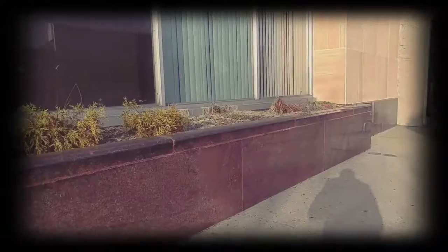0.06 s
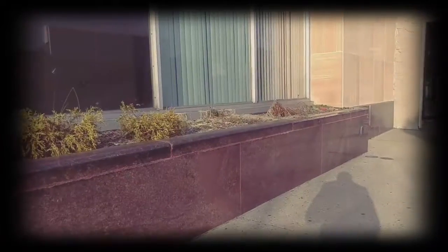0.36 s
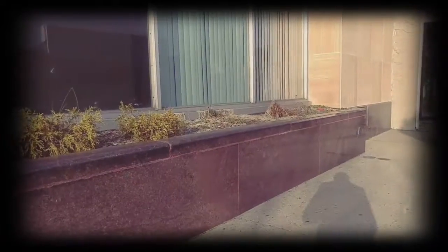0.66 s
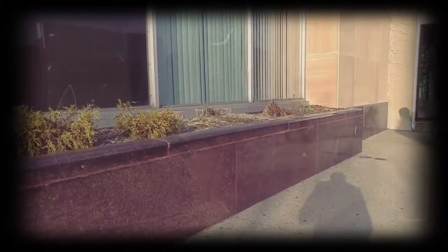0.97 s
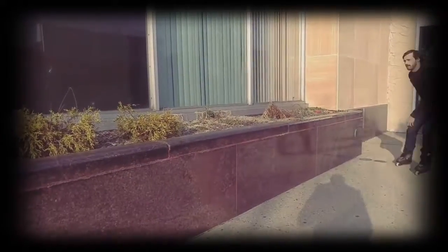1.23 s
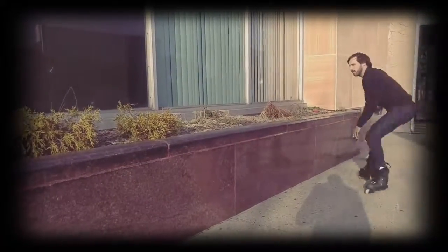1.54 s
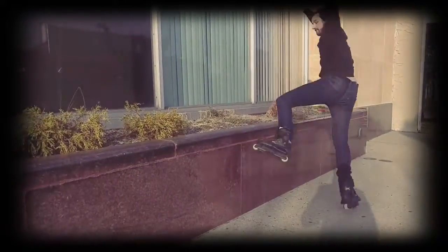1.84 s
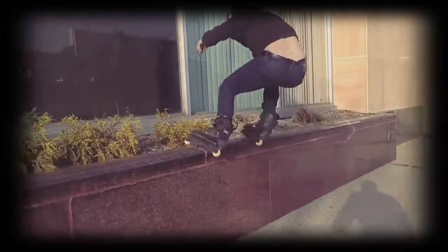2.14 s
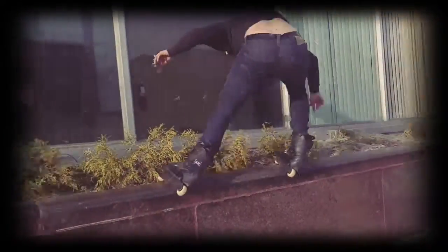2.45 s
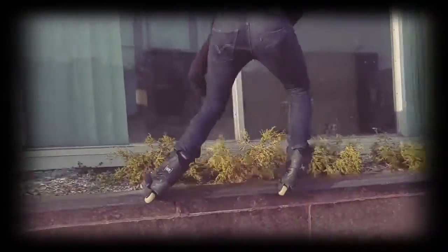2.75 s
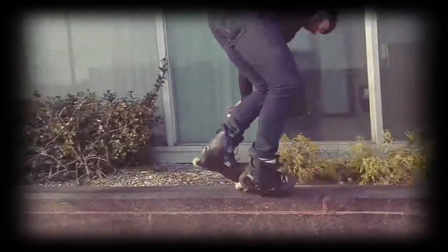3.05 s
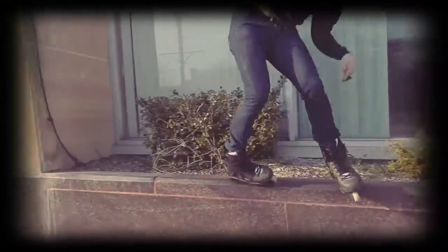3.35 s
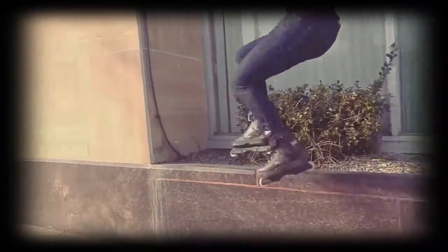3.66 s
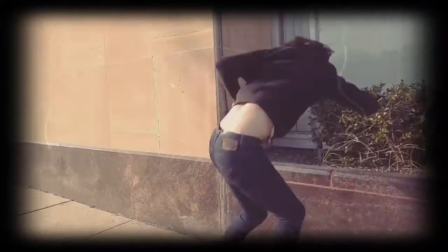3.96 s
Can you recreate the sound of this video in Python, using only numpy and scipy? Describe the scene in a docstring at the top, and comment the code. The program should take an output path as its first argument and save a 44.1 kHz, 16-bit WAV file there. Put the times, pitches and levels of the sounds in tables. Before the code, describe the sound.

Inline skates start rolling on gritty concrete close by at about 0.5 seconds, with a few clacks, whirring bearings and wind rumbling on the microphone until 1.3. After knocks around 1.7, the skates land hard on a stone ledge at 2.1 and grind along it in stuttering scrapes and clacks with a slight street echo. The grinding stops near 3.6, and wheels rumble on until 4 seconds.

```python
"""Inline skates grinding a ledge

Skates roll on a concrete sidewalk beside a building, one pair close to the microphone throughout.
A skater pushes off and jumps. Both skates clack onto a stone ledge and grind along it, their plastic
frames sticking and slipping on the edge, then slide off its end. The near wheels roll on, rumbling on
rough concrete and hissing on sand. Wind buffets the microphone early on, and the street echoes the blows."""
import sys
import numpy as np
from scipy import signal
from scipy.fft import rfft, irfft
from scipy.io import wavfile
from scipy.ndimage import uniform_filter1d, minimum_filter1d

SR = 44100
rng = np.random.default_rng(int(sys.argv[2]) if len(sys.argv) > 2 else 0)


def put_to_file(sound):
    """Save the sound as 16-bit audio at rate SR, in the file named by the first command-line argument."""
    columns = np.atleast_2d(sound).T  # one column per channel
    safe = np.clip(columns, -1, 1)
    whole_steps = np.round(safe * 32767)
    wavfile.write(sys.argv[1], SR, whole_steps.astype(np.int16))


N = 176400
T = np.arange(N) / SR

# Frames rubbing on the stone: t/s, length/s, ring level/dB, ring f/Hz, rasp level/dB, grit level/dB
SCRAPES = [(1.72, 0.089, -26, 738, -28.5, -33), (2.149, 0.042, -26, 830, -27, -27.5),
           (2.195, 0.034, -21, 773, -25, -23), (2.233, 0.13, -35, 690, -31.5, -29.5),
           (2.382, 0.023, -26, 710, -41, -26), (2.406, 0.28, -30, 895, -30, -31),
           (2.644, 0.024, -19, 954, -34, -29.5), (2.708, 0.039, -25.5, 900, -30, -31),
           (2.756, 0.075, -28.5, 900, -30.5, -33), (2.838, 0.12, -19.5, 881, -26, -24.5),
           (2.995, 0.038, -20.5, 864, -26, -24), (3.043, 0.26, -34.5, 854, -36, -39),
           (3.331, 0.151, -28, 905, -32.5, -35.5), (3.459, 0.16, -22.5, 957, -25.5, -26)]
# Bands in which boot and frame ring: multiple of the main pitch, level/dB, half width as a share of pitch
FRAME_BANDS = [(.38, -11, .2), (.77, -14, .09), (1, 0, .115)]
# Blows on concrete and stone:
# t/s, length/s, thud level/dB, ring level/dB, ring f/Hz, shell level/dB, crack level/dB
BLOWS = [(0.626, 0.0076, -20.5, -24.5, 730, -30.5, -35.5), (.661, 0.0087, -30, -26, 740, -27, -23.5),
         (0.674, 0.016, -22, -46, 734, -29.5, -31), (1.007, 0.0035, -23.5, -46, 725, -48, -28.5),
         (1.109, .004, -25, -48, 750, -34, -31), (1.626, 0.0037, -43, -37, 780, -41, -35),
         (1.708, 0.013, -21, -25, 695, -27.5, -27), (1.748, 0.0035, -36, -12, 810, -25, -33),
         (1.777, 0.0022, -27, -7, 734, -39, -26), (1.844, 0.0019, -42, -11, 745, -28, -38),
         (1.904, 0.011, -41, -39, 816, -36, -25), (2.1424, 0.0077, -17, -11, 844, -16, -15),
         (2.2681, 0.0074, -15.5, -7.5, 800, -17, -12), (2.275, 0.0082, -27, -12, 729, -10, -9),
         (2.297, 0.008, -13, -16.5, 740, -18, -17), (2.388, 0.0066, -25, -27, 690, -20.5, -27),
         (2.476, 0.011, -39, -27, 797, -24.5, -27), (2.491, 0.0068, -17.5, -13.5, 657, -16, -18),
         (2.64, 0.0029, -36, -11.5, 910, -26, -23), (2.659, 0.0036, -34, -10, 940, -42, -22.5),
         (2.683, 0.0048, -32, -15, 940, -27, -25.5), (2.713, 0.0042, -36, -16, 973, -32, -31),
         (2.836, 0.0077, -16, -10.5, 840, -17.5, -17.5), (2.854, 0.0043, -34, -9, 875, -17, -19.5),
         (2.876, 0.0027, -34, -7, 880, -35, -45), (2.887, 0.0038, -36, -12, 880, -34, -27),
         (2.9, 0.0049, -20, -9, 890, -22, -17.5), (2.916, 0.0084, -26, -15.5, 877, -23, -22),
         (2.995, 0.0092, -19, -18, 880, -30, -34), (3.099, 0.0037, -35, -11, 910, -18.5, -21),
         (3.126, 0.0054, -19, -11, 830, -21, -27.5), (3.172, 0.0014, -37, -29, 870, -31, -25),
         (3.2, 0.0044, -32, -41, 900, -22.5, -26), (3.215, 0.0029, -52, -34, 910, -23, -33),
         (3.248, 0.0034, -43, -41, 883, -20, -24), (3.282, 0.0036, -36, -19, 925, -22, -48),
         (3.305, 0.0083, -46, -19, 874, -24.5, -25), (3.314, 0.0068, -18.5, -9, 817, -17.5, -20),
         (3.377, 0.0075, -35, -16.5, 895, -42, -36), (3.476, 0.0049, -31, -17.5, 930, -26, -30),
         (3.501, 0.0027, -30, -6, 905, -36, -19.5), (3.519, 0.0057, -23, -12, 950, -21, -21),
         (3.551, 0.0099, -18, -16.5, 900, -22, -25.5), (3.601, 0.0047, -15, -12, 1000, -27, -31),
         (3.753, 0.013, -53, -26.5, 930, -25, -29), (3.81, 0.0034, -44, -48, 894, -32, -33.5)]
# Tones of the axle metal: f/Hz, level/dB, time to fade by 60 dB/s
PING_TONES = [(5300, -10, .012), (5580, -7, .012), (6000, -16, .008), (6750, -10, .013)]
# Free wheels shaking on their axles: t/s, length/s, level/dB
RATTLES = [(2.198, 0.025, -23.5), (2.301, 0.034, -26), (2.378, .026, -29.5), (3.193, 0.012, -33),
           (3.245, 0.0025, -21.5)]
# Pitch of the wheels' hum: t/s, f/Hz
HUM_PITCH = [(.6, 66), (1.1, 70.14), (1.5, 71.9), (1.8, 76), (2.4, 72), (4, 70.8)]
# Tones in that hum: multiple of the pitch, level/dB
HUM_TONES = [(1, 0), (2, -2)]
# Whirring bearings: f/Hz, width/Hz, level/dB, loudest at t/s, spread/s
BEARINGS = [(8500, 380, -40.5, 1.5, 0.36), (5170, 240, -48.5, 1.72, 0.18)]
# Echoes from pavement and wall: left delay/s, right delay/s, level/dB
ECHOES = [(.0052, 0.0067, -28), (0.0135, .0118, -16.5), (.024, .027, -37)]

# How the long sounds swell and fade: t/s, level/dB
RUMBLE_LEVEL = [(.435, -61), (.452, -38), (.5, -32.5), (.6, -28.5), (.68, -24.5), (.9, -25.5), (1.1, -24),
                (1.6, -22.5), (1.78, -22), (2.1, -24), (2.7, -26.5), (3.3, -23.5), (3.72, -23),
                (3.86, -26.5), (4, -25.5)]
SAND_LEVEL = [(.435, -66), (.46, -56.5), (.6, -43.5), (.7, -35.5), (.92, -38.5), (1.05, -35), (1.35, -34.5),
              (1.66, -38.5), (1.76, -28), (1.87, -35.5), (2.01, -30.5), (2.08, -44.5), (3.6, -34.5),
              (3.7, -45.5), (4, -48)]
HUM_LEVEL = [(.44, -82), (.65, -39), (1.05, -32.5), (1.45, -31), (1.8, -29), (2.1, -37), (4, -73)]
WIND_LEVEL = [(.44, -76), (.6, -37), (.74, -34), (.88, -32), (1.05, -31.5), (1.45, -51), (1.65, -60),
              (4, -81)]

# A "colour" says how strong a noise is from low to high pitch: f/Hz, relative level/dB
GRIT_COLOUR = [(60, -19), (170, 7.5), (340, 15.5), (520, 11), (750, -1), (1500, -30), (2700, -37),
               (3400, -5), (4500, -11.5), (6200, -6), (7200, 2), (7800, 2.5), (8400, 1), (10000, -7.5),
               (12500, -15), (16000, -27)]  # grit scraped off the ledge
SHELL_COLOUR = [(300, -43), (700, 4.5), (1050, 0.5), (1300, 3.5), (1650, 1.5), (2100, -4), (2700, -11),
                (3400, -8.5), (4400, -19.5), (8000, -40)]  # the boot's hard shell
THUD_COLOUR = [(40, -21), (95, 3.5), (170, 0), (260, -12), (350, 6), (440, -1), (530, -13), (800, -26),
               (2500, -62)]  # the hollow boot
CRACK_COLOUR = [(200, -17), (1300, -33), (2200, -13), (3200, -8), (4300, -3), (5400, 4), (6200, 3.5),
                (7200, 14.5), (7800, 9.5), (8400, 14.5), (10000, 4), (13000, -3), (16000, -10)]  # the sharp contact
SNAP_COLOUR = [(800, -20), (2000, 4), (3300, 9), (5000, 3), (7300, 13.5), (8400, 9.5), (11000, -13),
               (16000, -18)]  # the bright edge of the hardest blows
RATTLE_COLOUR = [(900, -36), (1620, -1), (1900, 7), (2130, 6), (2550, -11), (3400, -14), (6000, -13),
                 (14000, -34)]  # wheels and axles
RUMBLE_COLOUR = [(25, -58), (48, -2), (69, -5), (86, 0.5), (115, 2.5), (160, 1), (200, 4), (260, -0.5),
                 (350, 3.5), (440, -2), (515, -11.5), (610, 2.5), (720, 5), (900, -1.5), (1250, -10.5),
                 (2000, -19.5), (3000, -29.5), (6000, -36), (16000, -49)]  # rolling wheels and boots
SAND_COLOUR = [(900, 9), (2000, -6), (3000, 5), (4200, -4), (5200, 4), (6100, 2), (7300, 12), (7800, 5),
               (8500, 12), (9800, 2), (12000, -3.5), (16000, -13)]  # sand under the wheels
WIND_COLOUR = [(18, -42), (30, -11), (40, 9), (52, -15), (69, 16.5), (85, -15), (120, -39), (185, 2.5),
               (260, -20), (2000, -90)]  # air on the microphone

# How wide the noises sound: f/Hz, level/dB of the side (ears opposite) over the mid (ears alike)
STEREO_WIDTH = [(60, -15), (180, -18), (350, -13), (700, -4.5), (1400, 0), (2800, -0.5), (6000, 0.5),
                (16000, -1)]
# Which way the noises lean: f/Hz, level/dB of left over right
STEREO_LEAN = [(60, 0.5), (380, 1.7), (700, 0.9), (1300, 3.5), (2400, 5.5), (4400, -5), (8100, 1),
               (15000, -4.5)]

RING_SIDE_DB, RING_PAN_DB = -43, 1.5  # the frame's ring is narrow and a little to the left
CRACK_RISE_S, CRACK_FALL_S = 0.001, 0.0035


def grind():
    """The frames stick and slip; each slip rings the frame, rasps the shell and sheds a puff of grit."""
    slips_per_s, gap_jitter, size_spread_db = 95, 0.33, 3.5
    puff_fade_s, steady_rub = 0.015, 0.82
    rings, (rasp, grit) = np.zeros((2, N)), np.zeros((2, 1, N))
    t = T[:SR // 2]
    for start, length, ring_db, hz, rasp_db, grit_db in SCRAPES:
        gaps, sizes = rng.standard_normal((2, 100))
        slip_at = (np.cumsum(np.exp(gap_jitter * gaps)) / slips_per_s * SR).astype(int)
        fits = slip_at < len(t)
        slips = np.zeros(len(t))
        slips[slip_at[fits] - slip_at[0]] = from_db(size_spread_db * sizes[fits])
        fading_slips = signal.lfilter([1], [1, -np.exp(-1 / (puff_fade_s * SR))], slips)
        puffs = rms_one(steady_rub + rms_one(fading_slips))
        pressure = envelope(t, rise_s=0.0026, hold_s=length, fall_s=0.0085)
        rub, side = rng.standard_normal((2, len(t))) * puffs
        force = stereo(rms_one(slips) + 1.16 * rub, from_db(RING_SIDE_DB) * side)
        add(rings, start, from_db(ring_db) * pressure * steady(frame_ring(force, hz), samples=900))
        add(rasp, start, from_db(rasp_db) * pressure * puffs)
        add(grit, start, from_db(grit_db) * pressure * puffs)
    scraping = rasp * noise(SHELL_COLOUR) + grit * noise(GRIT_COLOUR)
    return rings * pan(RING_PAN_DB) + scraping * flutter(rate_hz=126, depth_db=2.15)


def clacks():
    """Each blow lasts a moment: the boot thuds, the frame rings, shell and wheels crack."""
    rings, (thud, shell, crack) = np.zeros((2, N)), np.zeros((3, 1, N))
    t = T[:SR // 5]
    for start, length, thud_db, ring_db, hz, shell_db, crack_db in BLOWS:
        burst = envelope(t, CRACK_RISE_S, length, CRACK_FALL_S)
        knock = envelope(t, rise_s=0.005, hold_s=length, fall_s=0.0046)
        bounce, side = rng.standard_normal((2, len(t)))
        force = stereo(bounce, from_db(RING_SIDE_DB) * side)
        add(rings, start, from_db(ring_db) * knock * steady(frame_ring(force, hz), samples=260))
        add(thud, start, from_db(thud_db) * knock)
        add(shell, start, from_db(shell_db) * burst)
        add(crack, start, from_db(crack_db) * burst)
    thuds = thud * steady(noise(THUD_COLOUR), samples=440)
    shells = shell * steady(noise(SHELL_COLOUR), samples=220)
    cracks = crack * noise(CRACK_COLOUR) * flutter(rate_hz=340, depth_db=1.0)
    # The snap grows faster than the crack, so the hardest blows are brighter.
    snaps = from_db(2) * crack ** 1.75 * noise(SNAP_COLOUR) * pan(db=3.5)
    return rings * pan(RING_PAN_DB) + thuds + shells + cracks + snaps


def frame_ring(force, hz):
    """A push makes boot and frame ring in a few narrow bands of pitch."""
    out = 0
    for ratio, db, width in FRAME_BANDS:
        edges = hz * ratio * np.exp([-width, width])
        band = signal.butter(3, edges, "band", fs=SR, output="sos")
        out = out + from_db(db) * signal.sosfilt(band, force + 1e-18)
    return out


def rattles():
    """A jolt sets the free wheels chattering briefly on their axles."""
    shake, t = np.zeros((1, N)), T[:SR // 5]
    for start, length, db in RATTLES:
        add(shake, start, from_db(db) * envelope(t, CRACK_RISE_S, length, CRACK_FALL_S))
    return shake * steady(noise(RATTLE_COLOUR), samples=220) * flutter(rate_hz=170, depth_db=4.0)


def axle_ping():
    """Metal touches the stone and rings as the first skate lands."""
    out, click = np.zeros((2, N)), T[:SR // 5] == 0
    ping = sum(from_db(db) * resonate(click, hz, fade_s) for hz, db, fade_s in PING_TONES)
    add(out, start_s=2.1445, sound=ping)
    return out * pan(db=1.5)


def rolling():
    """Rough concrete shakes wheels and boots; sand crunches under them."""
    rumble = level(RUMBLE_LEVEL) * steady(noise(RUMBLE_COLOUR), samples=2200)
    rumble *= flutter(rate_hz=30, depth_db=0.75)
    sand = level(SAND_LEVEL) * noise(SAND_COLOUR)
    return rumble + sand * flutter(rate_hz=34, depth_db=2.5) * flutter(rate_hz=1800, depth_db=1.0)


def wheel_hum():
    """The rolling wheels give a low, wavering hum."""
    hz = np.interp(T, *np.transpose(HUM_PITCH)) * flutter(rate_hz=11.2, depth_db=0.74)
    phase = 2 * np.pi * np.cumsum(hz) / SR
    tones = sum(from_db(db) * np.sin(multiple * phase) * flutter(rate_hz=5.9, depth_db=5.0)
                for multiple, db in HUM_TONES)
    return level(HUM_LEVEL) * tones


def bearings():
    """The wheel bearings sing in thin whirrs that swell and fade during the run-up."""
    out = np.zeros((2, N))
    for hz, width_hz, db, peak_s, spread_s in BEARINGS:
        fade_s = np.log(1000) / (np.pi * width_hz)  # a narrower band rings longer
        whirr = rms_one(resonate(rng.standard_normal((2, N)), hz, fade_s))
        swell = np.exp(-0.5 * ((T - peak_s) / spread_s) ** 2)
        out += from_db(db) * swell * whirr * flutter(rate_hz=17, depth_db=1)
    return out


def wind():
    """Air buffets the moving microphone with a low rumble that soon dies down."""
    return level(WIND_LEVEL) * steady(noise(WIND_COLOUR), samples=4400)


def street_echo(x):
    """Pavement and wall throw back a few quick echoes and a faint tail."""
    tail_fade_s, tail_db = 0.13, -12.5
    out, t = np.zeros((2, N)), T[:SR // 2]
    for left_s, right_s, db in ECHOES:
        add(out[:1], left_s, from_db(db) * x[0])
        add(out[1:], right_s, from_db(db) * x[1])
    tail = rng.standard_normal((2, len(t))) * from_db(-60 * t / tail_fade_s)
    tail /= np.linalg.norm(tail[0])
    return out + from_db(tail_db) * signal.fftconvolve(x, tail, axes=1)[:, :N]


def noise(colour):
    """Stereo noise of a given colour, wider in the treble, with an average strength of 1."""
    log_hz = np.log(np.maximum(np.arange(N // 2 + 1) * SR / N, 1))
    def gain(points):
        hz, db = np.transpose(points)
        return from_db(np.interp(log_hz, np.log(hz), db))
    mid, side = rfft(rng.standard_normal((2, N))) * gain(colour)
    lean = np.sqrt(gain(STEREO_LEAN))
    spectrum = stereo(mid, side * gain(STEREO_WIDTH)) * [lean, 1 / lean]
    return rms_one(irfft(spectrum, N))


def flutter(rate_hz, depth_db):
    """A random wobble to multiply by; a higher rate wobbles faster."""
    r = np.exp(-2 * np.pi * rate_hz / SR)
    drift = signal.lfilter([1], [1, -2 * r, r * r], rng.standard_normal(N + SR))[SR:]
    return rms_one(from_db(depth_db * rms_one(drift)))


def resonate(force, hz, fade_s):
    """Ring at one pitch when pushed, dying away by 60 dB in fade_s."""
    r, angle = from_db(-60 / (fade_s * SR)), 2 * np.pi * hz / SR
    return signal.lfilter([0.5, 0, -0.5], [1, -2 * r * np.cos(angle), r * r], force + 1e-18)


def envelope(t, rise_s, hold_s, fall_s):
    """Loudness that rises in a straight line and dies away once t passes hold_s."""
    return np.clip(t / rise_s, 0, 1) * np.exp(-np.maximum(t - hold_s, 0) / fall_s)


def steady(x, samples):
    """Even out a sound so its strength stays near 1 over a moving window."""
    return x / np.sqrt(uniform_filter1d(np.mean(x ** 2, axis=0), samples) + 1e-12)


def rms_one(x):
    """Scale to an average strength (root mean square) of 1."""
    return x / np.sqrt(np.mean(x ** 2) + 1e-20)


def from_db(db):
    """Turn decibels into a gain, a number to multiply by."""
    return 10 ** (np.asarray(db) / 20)


def level(curve):
    """Gain over time from points of t/s, level/dB."""
    return from_db(np.interp(T, *np.transpose(curve)))


def pan(db):
    """Gains that make the left louder than the right by db."""
    return from_db(np.array([[db], [-db]]) / 2)


def stereo(mid, side):
    """Left and right from what they share (mid) and what sets them apart (side)."""
    return np.array([mid + side, mid - side])


def add(out, start_s, sound):
    """Mix a sound in at a given time."""
    i = int(start_s * SR)
    out[:, i:i + sound.shape[-1]] += sound[..., :N - i]


def scene():
    """Scrapes and blows echo off the street, over rolling wheels and wind."""
    skates = grind() + clacks() + rattles() + axle_ping()
    return skates + rolling() + wheel_hum() + wind() + street_echo(skates) + bearings()


def record(dry):
    """Start out of silence, turn the loudest blows down with a fast limiter and cut the highest treble."""
    start_s, fade_in_s = 0.435, 0.01
    limit_db, release_db_per_s, stop_hz = 0.4, 3000, 16700
    opened = dry * np.clip((T - start_s) / fade_in_s, 0, 1)
    peak_db = 20 * np.log10(np.abs(opened).max(axis=0) + 1e-9)
    over_db = np.maximum(peak_db - limit_db, 0)
    recovery_db = release_db_per_s * T
    cut_db = np.maximum.accumulate(over_db + recovery_db) - recovery_db
    gain = uniform_filter1d(minimum_filter1d(from_db(-cut_db), size=31), size=31)
    treble_cut = signal.cheby2(16, 60, stop_hz, fs=SR, output="sos")
    return signal.sosfilt(treble_cut, opened * gain)


dry = scene()
out = record(dry)
put_to_file(out)
```